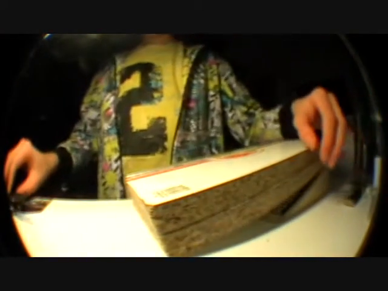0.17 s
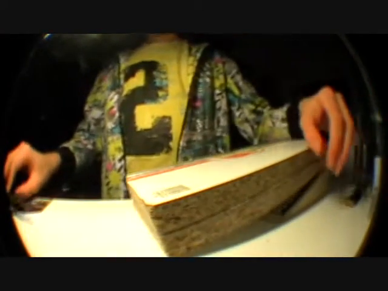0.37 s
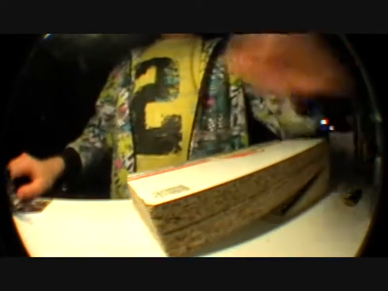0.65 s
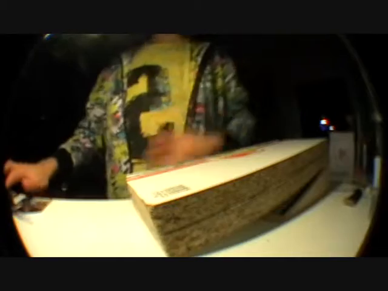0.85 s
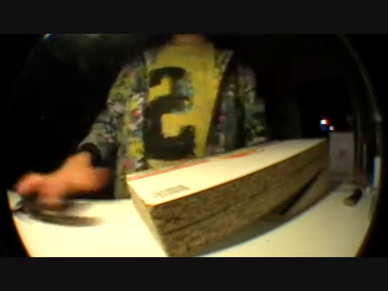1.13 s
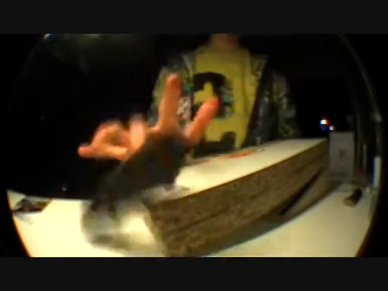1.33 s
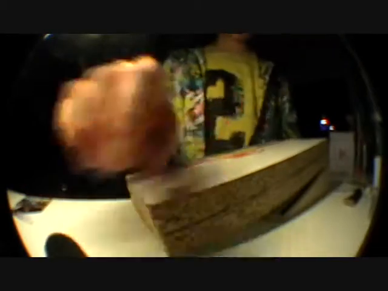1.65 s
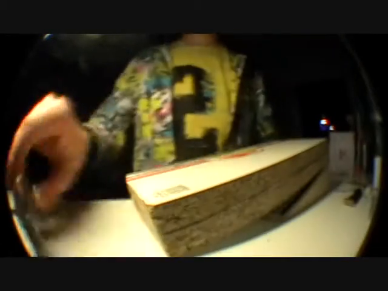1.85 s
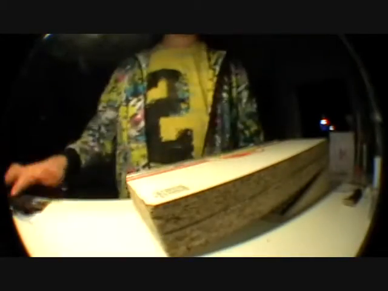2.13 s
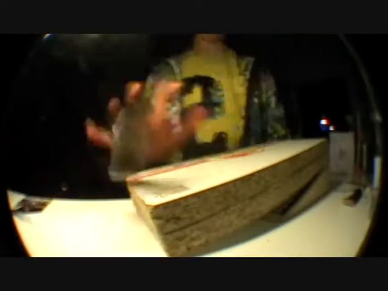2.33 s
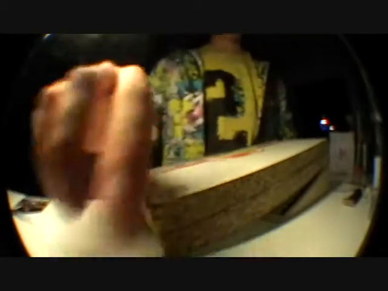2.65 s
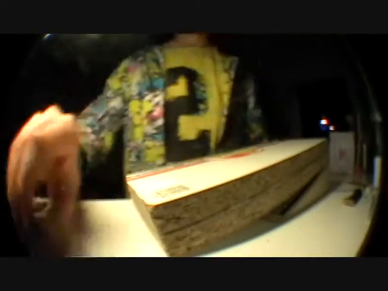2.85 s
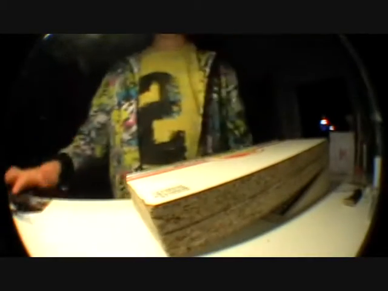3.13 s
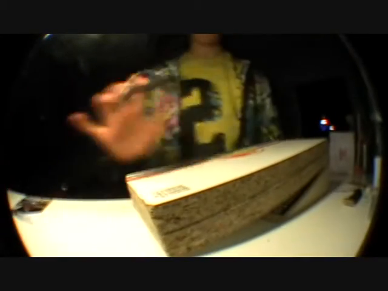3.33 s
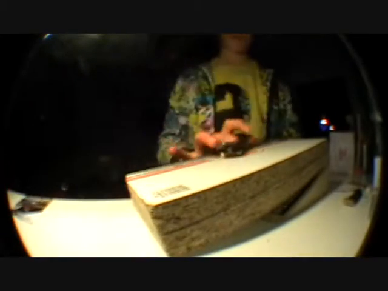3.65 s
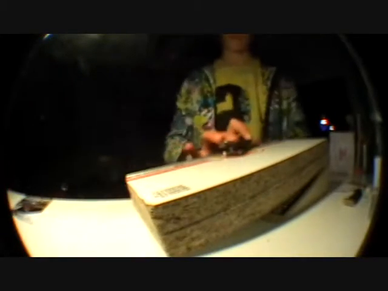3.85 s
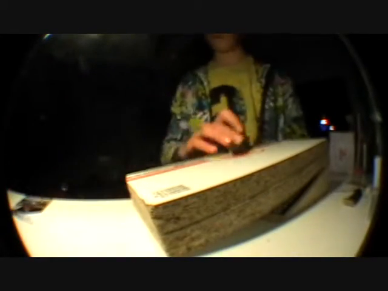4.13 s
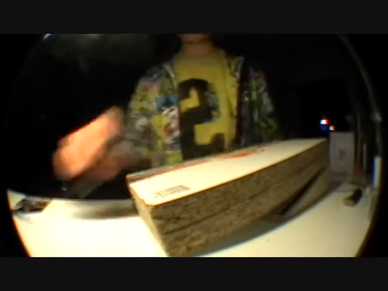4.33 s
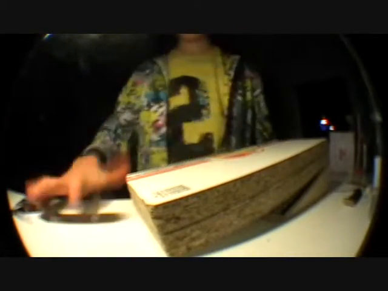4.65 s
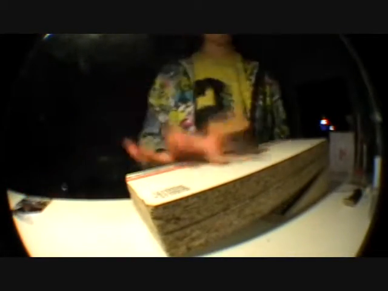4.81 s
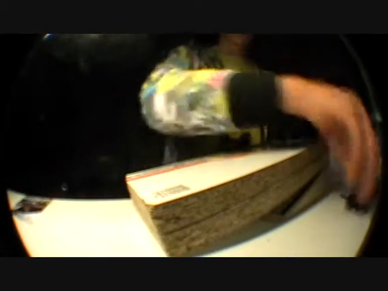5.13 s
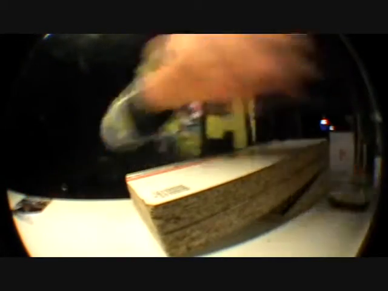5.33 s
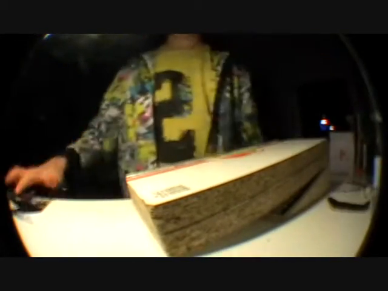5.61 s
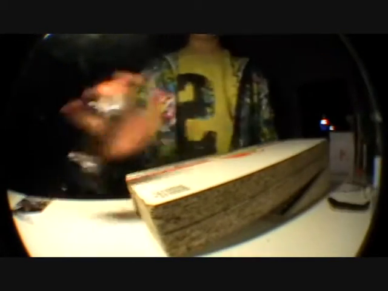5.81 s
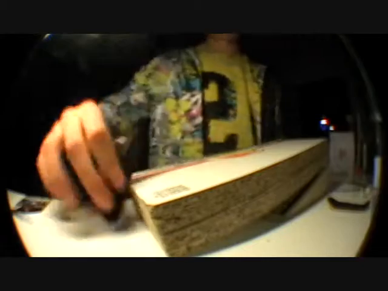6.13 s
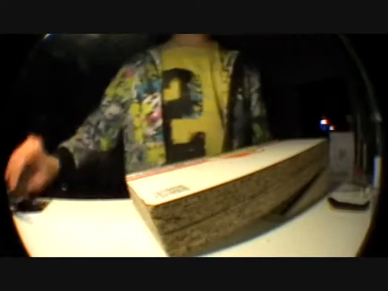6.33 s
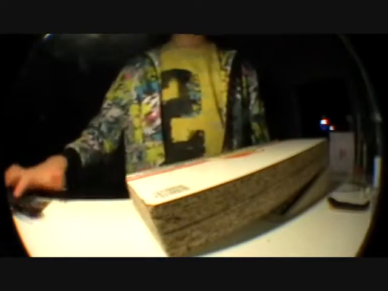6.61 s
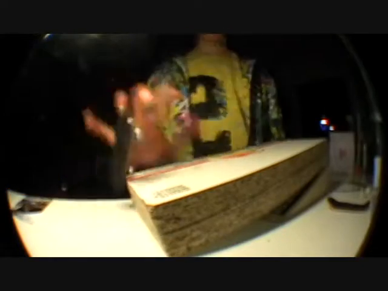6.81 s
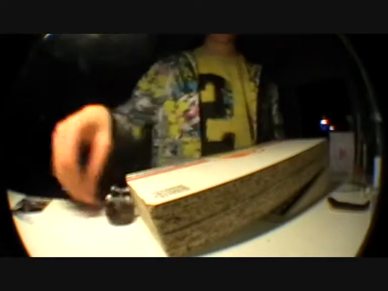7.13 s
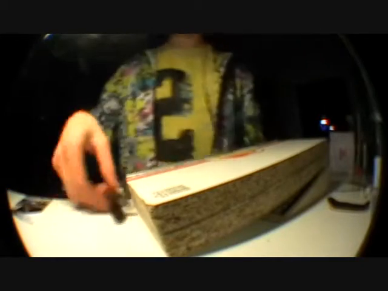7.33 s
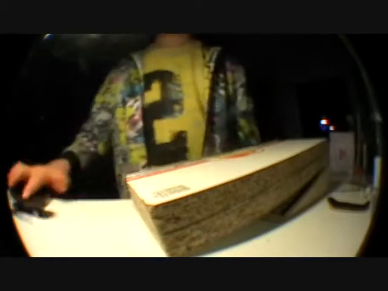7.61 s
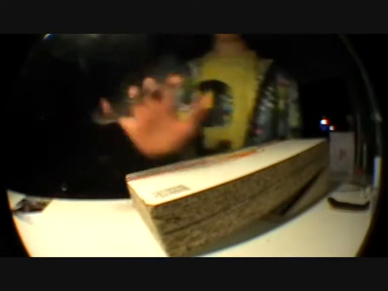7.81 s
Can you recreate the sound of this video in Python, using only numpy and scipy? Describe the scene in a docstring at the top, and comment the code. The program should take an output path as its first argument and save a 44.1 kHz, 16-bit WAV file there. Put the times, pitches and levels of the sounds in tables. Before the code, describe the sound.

Close stereo microphones in a small, dry room catch a miniature finger skateboard on a hollow table beside a low wooden ledge. After a faint rattle and a clack, short gritty rolls end in sharp pops, followed by bursts of clattering, metal ticks and soft hand thuds. The attempts repeat quickly over a low steady murmur, some blows harshly overloaded.

```python
"""First a faint rattle over a low room murmur, then a toy finger skateboard rolls, pops and tumbles.
It is played on a hollow table and a low ledge in a small quiet room, close to a pair of microphones.
Each blow rings the little deck, the surface and the metal trucks; the hand lands with dull thuds.
Random bumps drive the same parts as the wheels grind between the blows.
The room answers briefly, the loudest blows overload the recorder, and the sound drops out once."""
import sys
import numpy as np
from scipy import signal
from scipy.io import wavfile
from scipy.ndimage import uniform_filter1d

SR = 44100
rng = np.random.default_rng(int(sys.argv[2]) if len(sys.argv) > 2 else 0)


def store_wav(level_fs):
    """Save 16-bit WAV to argv[1]."""
    pcm = np.round(np.clip(np.atleast_2d(level_fs), -1, 1) * 32767)
    wavfile.write(sys.argv[1], SR, pcm.T.astype(np.int16))


N = 351036

# room air, shape of its spectrum: pitch_hz, level_db (relative, per Hz)
AIR_SPECTRUM = [(15, -41.5), (25, -16), (206, -13.5), (463, -7.5), (503, -53), (624, -5.5), (840, -16.5),
                (2280, -19.5), (5000, -35), (16000, -43)]
AIR_DB = -53.5  # overall RMS level
AIR_LIKENESS = 0.17  # left-right correlation of the air, 0 to 1
# decay of the small room: pitch_hz, t60_s
ROOM_T60 = [(200, 0.062), (1400, 0.042), (4000, 0.065), (12000, 0.058)]

# modes of the hollow table top: pitch_hz, level_db (relative), t60_s (nominal)
TABLE = [(155, -13, .07), (240, -7, .06), (290, 0, .17), (345, -4, .06), (398, 0, .14)]
# modes of the low ledge: pitch_hz, level_db (relative), t60_s (nominal)
LEDGE = [(713, -14.5, 0.064), (933, -10.5, 0.077), (1066, 9.5, 0.014), (1252, -1, 0.039), (1489, 1, 0.044)]
# modes of the little deck: pitch_hz, level_db (relative), t60_s (nominal)
DECK = [(1960, -38, 0.028), (2256, 2.5, 0.027), (2464, 4, 0.013), (2895, 4.5, 0.0061)]
# modes of the metal trucks: pitch_hz, level_db (relative), t60_s (nominal)
TRUCKS = [(3620, -5.5, 0.018), (4055, -1.5, 0.022), (4460, 6.5, 0.0044), (6020, 6.5, 0.0029),
          (7160, -2.5, 0.0039), (8610, -4, 0.0036), (10115, -4, 0.006), (11630, -3.5, 0.0026),
          (15200, -34.5, 0.0024)]
# modes of the hand's dull thud: pitch_hz, level_db (relative), t60_s (nominal)
PALM = [(95, -4, 0.042), (154, -3.5, 0.032), (248, -2.7, 0.021)]

# where the board is: time_s, left_minus_right_db
BOARD_PAN = [(0.0, 4), (4.34, 0), (7.96, 0.5)]

# run-ups to a jump: push_off_s, bear_down_s, front_lift_s, scrape_end_s,
# roll_db, bear_db, scrape_db (relative grind levels)
RUNS = [(1.125, 1.245, 1.32, 1.336, -23, -20.5, -14), (2.24, 2.291, 2.382, 2.37, -28, -19, -9),
        (3.245, 3.333, 3.388, 3.414, -26, -18.5, -17), (4.643, 4.73, 4.832, 4.81, -33, -22.5, -13.5),
        (5.778, 5.823, 5.878, 5.906, -24.5, -23, -17), (6.712, 6.774, 6.83, 6.9, -29, -18.5, -31),
        (7.773, 7.804, 7.83, 7.57, -29, -16.5, -21.5)]
SPEED_UP_DB, SCRAPE_RISE_DB = 13, 22  # rise of the grind while rolling, while scraping
SWELL_DB = 6  # bearing down swells and eases by this much
ROLL_HISS_DB, BEAR_HISS_DB, SCRAPE_HISS_DB = -23.5, -7, -8  # relative to the grind
# the loose board rattles to rest: start_s, grind_db (relative), length_s, hiss_db (relative to grind)
RATTLES = [(0, -40, 0.14, -20), (0.369, -42.5, .06, -13.5), (0.903, -31, 0.041, -9.5),
           (2.191, -36.5, 0.042, -6), (3.553, -26, 0.086, -5), (4.299, -37, 0.064, -8),
           (4.938, -21.5, .1, -8.5), (5.078, -25, 0.045, -25), (5.683, -39.5, 0.11, -19),
           (5.986, -27, 0.057, -8), (6.055, -34, 0.06, -4.5), (6.475, -28.5, .077, -7.5),
           (6.857, -29, 0.025, -1), (6.948, -28.5, .039, -13), (6.986, -21, 0.067, -13.5),
           (7.067, -26, 0.051, -22), (7.208, -25.5, 0.052, -7), (7.358, -41.5, 0.047, -5),
           (7.506, -29, 0.071, -17), (7.644, -27.5, 0.11, -10.5), (7.847, -35, 0.1, -8.5)]
RATTLE_FADE_DB_PER_S = 172
# the board is dragged, slides or tumbles: start_s, end_s, grind_db (relative), hiss_db (relative to grind)
SLIDES = [(0.49, 0.629, -46.5, -42), (0.707, 0.772, -51, -14), (0.968, 1.13, -46.5, -24),
          (1.425, 1.61, -38.5, -2), (1.868, 1.952, -30.5, -3), (2.073, 2.206, -30.5, -15.5),
          (2.464, 2.648, -35, -4), (2.872, 2.976, -32, 1.5), (3.104, 3.242, -33, -12.5),
          (4.187, 4.282, -42, -7.5), (4.512, 4.606, -27, -8), (4.991, 5.066, -39.5, 1.5),
          (5.132, 5.203, -31.5, -2.5), (5.299, 5.439, -33.5, -12), (5.605, 5.679, -28, -4.5),
          (6.132, 6.172, -29, -18), (6.197, 6.285, -35.5, 1), (6.572, 6.74, -41, -16.5),
          (7.168, 7.204, -34.5, 1.5), (7.428, 7.474, -31.5, -2.5), (7.63, 7.641, -31.5, -10)]
SLIDE_FADE_DB = 4
# a fingertip creeps the board on until it catches: catch_s, grind_db (relative)
NUDGES = [(0.794, -35.5), (0.833, -28.5), (0.892, -24.5)]
NUDGE_S, NUDGE_RISE_DB, NUDGE_HISS_DB = 0.022, 17, -42

# how the board meets the surface: thump_db of the table, knock_db of the ledge (both relative)
GLANCE, DROP, LAND, SLAM = (-23, -21), (-12.5, -24), (-8.5, -19), (-3.2, -10.5)  # on the table
POP = (4, -4)  # the tail snapping on the table
EDGE, CORNER, PRESS = (-10.5, 4.65), (-18, -6), (14.6, 5.2)  # on the ledge; a finger pressing down
# blows: start_s, deck_db (relative), tick_db of the trucks (relative to deck), contact (one of the above)
BLOWS = [(0.0984, -41.5, 2, DROP), (0.377, -24, -14.5, GLANCE), (0.9103, -7.5, -13, DROP),
         (1.203, -24.5, -18, EDGE), (1.29, -28, -18, EDGE), (1.325, -16.5, 2, POP), (1.431, -12.5, 4, SLAM),
         (1.4526, -24.5, 7, GLANCE), (1.4609, -18.5, 6, DROP), (1.491, -1, -8.5, CORNER),
         (1.513, -13.5, 0, DROP), (1.5326, -12, -2, GLANCE), (1.5374, -25, 8, GLANCE),
         (1.572, -20.5, 10, GLANCE), (1.5996, -30.5, 1.5, EDGE), (1.674, -30.5, -4.5, EDGE),
         (1.7469, -37, -28, PRESS), (1.8786, -17.5, 6, DROP), (1.916, -30, 6, GLANCE),
         (2.044, -39.5, 6, GLANCE), (2.0711, -18.5, -14, LAND), (2.1216, -6, -9.5, GLANCE),
         (2.154, -6.5, -4, GLANCE), (2.1816, -19.5, -7, EDGE), (2.2962, -6.5, -22, GLANCE),
         (2.373, -13.5, 6, POP), (2.4845, -12, 8, DROP), (2.5166, -15.5, 1, GLANCE),
         (2.541, 1, -8.5, CORNER), (2.5695, -8, 4.5, GLANCE), (2.591, -22, 3, GLANCE),
         (2.602, -22.5, 8.5, GLANCE), (2.621, -26, 6, GLANCE), (2.631, -20.5, 1, EDGE),
         (2.6417, -15.5, -1, EDGE), (2.6618, -32.5, 6.5, DROP), (2.864, -38, -16, PRESS),
         (2.874, -26, -3, SLAM), (2.8866, -32.5, 14.5, EDGE), (2.9156, -16, 7.5, CORNER),
         (2.932, -31, 3, GLANCE), (2.9948, -41, 13, GLANCE), (3.1159, -10.5, -10, LAND),
         (3.1921, -8.5, -8.5, GLANCE), (3.2661, -17, -23, CORNER), (3.346, -7, -35, GLANCE),
         (3.3734, -11, -3, CORNER), (3.4168, -16.5, 5.5, POP), (3.5626, -14, 6, CORNER),
         (3.5706, -10.5, -3, CORNER), (3.632, -26, -1, DROP), (3.691, -34, -0.5, GLANCE),
         (3.8918, -16, -1.5, CORNER), (4.2089, -19.5, -11, CORNER), (4.2353, -22, 6, GLANCE),
         (4.3071, -16, 1, DROP), (4.5196, -7.5, -10.5, LAND), (4.572, -19, -7, DROP),
         (4.6736, -21, -20, DROP), (4.7353, -14.5, -18, GLANCE), (4.776, -6, -5, CORNER),
         (4.818, -14, 3, POP), (4.944, -13, -27, GLANCE), (4.9531, -4, -2.5, CORNER),
         (4.988, -21, 4, GLANCE), (5.02, -33, 6, GLANCE), (5.0379, -24.5, -4, EDGE),
         (5.0734, -0.5, -4, EDGE), (5.125, -8, 1, GLANCE), (5.1491, -16, -5, GLANCE),
         (5.1619, -22, 6.5, SLAM), (5.1699, -22.5, 11, GLANCE), (5.3035, -7.5, -24, CORNER),
         (5.3139, -13.5, -5, GLANCE), (5.3443, -13.5, -17, CORNER), (5.3739, -15, -2.5, GLANCE),
         (5.3944, -24.5, -21, EDGE), (5.4215, -27, -32, EDGE), (5.4623, -47, 12.5, DROP),
         (5.52, -51, 13.5, DROP), (5.5594, -55.5, 9, DROP), (5.6113, -16, -10, LAND),
         (5.6301, -18.5, -3, EDGE), (5.6526, -15, -5.5, SLAM), (5.719, -33.5, -21, EDGE),
         (5.752, -48, 3, GLANCE), (5.8295, -10, -18, GLANCE), (5.874, -25, -4, GLANCE),
         (5.9058, -18.5, 5.5, POP), (5.9921, -5, -2.5, GLANCE), (6.0192, -10, 0.5, DROP),
         (6.056, -29, 3, GLANCE), (6.0639, 0, -9.5, CORNER), (6.156, -17, -28, EDGE),
         (6.2131, -13.5, -5, EDGE), (6.2174, -14, 2.5, SLAM), (6.248, -38, 2, PRESS),
         (6.3013, -42.5, 21.5, GLANCE), (6.484, -10.5, -17.5, LAND), (6.508, -6, -11.5, GLANCE),
         (6.5824, -40, -14, EDGE), (6.594, -28, -4, EDGE), (6.6428, -9.5, -9.5, GLANCE),
         (6.733, -32, -20, EDGE), (6.759, -12.5, -9.5, GLANCE), (6.7803, -16.5, -2, GLANCE),
         (6.861, -18.5, 2, POP), (6.9585, -19, 9.5, SLAM), (6.9941, -11.5, -32, DROP),
         (7.075, -27, 10, EDGE), (7.188, -23, -3, SLAM), (7.1998, -8, -21, SLAM), (7.2171, -15, 2, CORNER),
         (7.3505, -26, -33, SLAM), (7.367, -30, 1.5, GLANCE), (7.4309, -28.5, 1.5, SLAM),
         (7.489, -21, -20, EDGE), (7.5098, -13, -11.5, EDGE), (7.634, -23.5, -20, SLAM),
         (7.6528, -15.5, 4, GLANCE), (7.6765, -3, -6, CORNER), (7.8276, -19.5, 8.5, CORNER),
         (7.87, -11.5, 5, POP)]
# the hand landing on the table: start_s, level_db (relative)
THUDS = [(1.743, -35.5), (2.532, -16.5), (5.987, -21), (6.218, -17), (7.192, -14), (7.462, -24.5)]

DROPOUT_START_S, DROPOUT_END_S, DROPOUT_DB = .448, .474, -28
BAND_LIMIT_HZ = 16400


def amp(db):
    """Decibels to an amplitude factor."""
    return 10 ** (np.asarray(db) / 20)


def evened(x):
    """Scale to an RMS of 1."""
    return x / np.sqrt(np.mean(x ** 2) + 1e-20)


def read(points, hz):
    """Read a (pitch, value) curve along a logarithmic pitch axis."""
    f, value = np.transpose(points)
    return np.interp(np.log(hz + 1), np.log(f + 1), value)


def air():
    """Steady room murmur and microphone hiss: shaped noise, only partly alike at the two microphones."""
    frames, hz = N // 256 + 5, np.fft.rfftfreq(1024, 1 / SR)
    a, b, c, d = rng.standard_normal((4, len(hz), frames))
    left, other = a + 1j * b, c + 1j * d
    right = AIR_LIKENESS * left + np.sqrt(1 - AIR_LIKENESS ** 2) * other
    spectrum = np.array([left, right]) * amp(read(AIR_SPECTRUM, hz))[:, None]
    noise = signal.istft(spectrum, nperseg=1024, noverlap=768)[1][:, :N]
    return amp(AIR_DB) * evened(noise)


def room(x):
    """Sparse echoes of random sign from 3 ms on, each band dying at its own speed, unlike at each microphone."""
    taps = np.zeros((2, SR // 2))
    slots = np.arange(130, SR // 2 - 20, 20)
    at = slots + rng.integers(0, 20, (2, len(slots)))  # one echo somewhere in each slot
    np.put_along_axis(taps, at, rng.choice([-1., 1.], at.shape), 1)
    hz, t, bands = signal.stft(taps, SR, nperseg=128)
    decay = amp(-60 * t / read(ROOM_T60, hz)[:, None])
    tail = signal.istft(bands * decay, SR, nperseg=128)[1]
    return signal.oaconvolve(x, tail / np.linalg.norm(tail[0]), axes=1)[:, :N]


def ring(modes, scatter_db, detune, sustain):
    """One impulse response of a part: decaying sines, each mode's level and pitch scattered at random."""
    hz, db, t60 = np.transpose(modes)[:, :, None]
    t = np.arange(SR // 4) / SR
    level_chance, pitch_chance = rng.standard_normal((2, len(modes), 1))
    envelope = amp(db + scatter_db * level_chance - 60 * t / (sustain * t60))
    waves = envelope * np.sin(2 * np.pi * hz * (1 + detune * pitch_chance) * t)
    return waves.sum(0)


def strokes():
    """Every rub as (start_s, end_s, grind_db at start and end, hiss_db relative to grind)."""
    for start, bear, lift, scrape_end, roll_db, bear_db, scrape_db in RUNS:
        middle = (bear + lift) / 2
        yield start, bear, (roll_db - SPEED_UP_DB, roll_db), ROLL_HISS_DB
        yield bear, middle, (bear_db - SWELL_DB, bear_db), BEAR_HISS_DB
        yield middle, lift, (bear_db, bear_db - SWELL_DB), BEAR_HISS_DB
        # no scrape where the fourth time is not after the third
        yield lift, scrape_end, (scrape_db - SCRAPE_RISE_DB, scrape_db), SCRAPE_HISS_DB
    for start, db, length, hiss_db in RATTLES:
        yield start, start + length, (db, db - RATTLE_FADE_DB_PER_S * length), hiss_db
    for start, end, db, hiss_db in SLIDES:
        yield start, end, (db, db - SLIDE_FADE_DB), hiss_db
    for end, db in NUDGES:
        yield end - NUDGE_S, end, (db - NUDGE_RISE_DB, db), NUDGE_HISS_DB


def grit(per_s, spread_db):
    """Tiny bumps under the wheels at random moments, mostly small, some large."""
    size = amp(spread_db * np.minimum(rng.exponential(1, N), 5))
    sign = rng.choice([-1., 1.], N)
    return size * sign * (rng.random(N) < per_s / SR)


def rolling():
    """Bumps under wheels and fingers drive the same parts as the blows, each part in its own uneven clumps."""
    grind, hiss = np.zeros((2, N))
    for start, end, grind_db, hiss_db in strokes():  # a later stroke replaces an earlier one
        span = slice(round(start * SR), round(end * SR))
        grind[span] = amp(np.linspace(*grind_db, len(grind[span])))
        hiss[span] = grind[span] * amp(hiss_db)
    # part, push, left-right spread, bumps per second
    layers = [(DECK, grind * amp(-3.5), .2, 2500.), (LEDGE, grind * amp(-5.5), .4, 1500.),
              (TRUCKS, hiss * amp(2.5), .4, 2500.), (TABLE, grind * amp(-14.5), .2, 400.)]
    t = np.arange(SR // 8) / SR
    coast = np.exp(-t / 0.0026) + .03 * np.exp(-t / .025)  # the wheels spin on a moment after lifting
    out = np.zeros((2, N))
    for modes, push, width, per_s in layers:
        body = ring(modes, scatter_db=0, detune=0, sustain=0.99)
        drift = evened(uniform_filter1d(rng.standard_normal(N), size=800))  # over about 18 ms
        push = signal.oaconvolve(push, coast / coast.sum())[:N] * amp(3.5 * drift)
        mid, side = (signal.oaconvolve(evened(grit(per_s, 3.2)) * push, body)[:N] for _ in range(2))
        out += (mid + width * np.array([side, -side])) / np.linalg.norm(body)
    return out


def strike(modes, contact_s, scatter_db, detune):
    """A short rattling contact, a click and dying noise, drives the modes; peak 1."""
    t = np.arange(SR // 50) / SR
    sustain = rng.uniform(.6, 1.2)  # how long the part rings varies at random from blow to blow
    contact = (0.36 * (t == 0) + rng.standard_normal(len(t)) * .5) * np.exp(-t / contact_s)
    sound = signal.fftconvolve(ring(modes, scatter_db, detune, sustain), contact)[:SR // 4]
    return sound / abs(sound).max()


def blows():
    """Every part of the board and the surface under it rings at each blow; the hand adds its own thuds."""
    out = np.zeros((2, N + SR))
    for s, db, tick_db, (thump_db, knock_db) in BLOWS:
        deck = strike(DECK, .0015, 4, .02)
        table = amp(thump_db) * strike(TABLE, .0004, 2.5, .02)
        # the ledge is wide and the two trucks tick apart, so each microphone hears them its own way
        knock_mid, knock_side = (amp(knock_db) * strike(LEDGE, .002, 4, .03) for _ in range(2))
        tick_mid, tick_side = (amp(tick_db) * strike(TRUCKS, .0015, 4, .05) for _ in range(2))
        mid = deck + table + 0.71 * knock_mid + 1.71 * tick_mid
        side = .3 * knock_side + 1.1 * np.gradient(tick_side)  # the trucks differ most in the treble
        at = round(s * SR)
        out[:, at:at + len(mid)] += amp(db) * (mid + np.array([side, -side]))
    for s, db in THUDS:
        at = round(s * SR)
        out[:, at:at + SR // 4] += amp(db) * strike(PALM, .006, 2, .1)
    return out[:, :N]


def placed(pair):
    """Leans a pair of signals towards the side where the board is."""
    pan_db = np.interp(np.arange(N) / SR, *np.transpose(BOARD_PAN))
    return pair * amp(np.array([pan_db, -pan_db]) / 2)


def scene():
    """The board close to the microphones, its room answer behind it, and the room air."""
    board = placed(amp(2.5) * blows() + rolling())
    no_bass = signal.butter(3, 120., "high", fs=SR, output="sos")  # small parts radiate no deep bass
    board = signal.sosfilt(no_bass, board)
    return board + amp(-11.0) * room(board) + air()


def record(dry):
    """A brief dropout, soft overload at full scale, then the band limit."""
    corners_s = [DROPOUT_START_S - .001, DROPOUT_START_S, DROPOUT_END_S, DROPOUT_END_S + 0.0023]
    gain_db = np.interp(np.arange(N) / SR, corners_s, [0, DROPOUT_DB, DROPOUT_DB, 0])
    loud = dry * amp(gain_db)
    clipped = loud / (1 + abs(loud) ** 6) ** (1 / 6)
    low_pass = signal.firwin(511, BAND_LIMIT_HZ, window=("kaiser", 9), fs=SR)
    return signal.oaconvolve(clipped, low_pass[None], "same")


dry = scene()
out = record(dry)
store_wav(out)
```